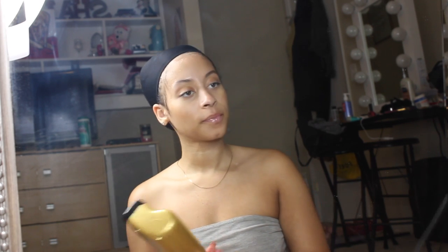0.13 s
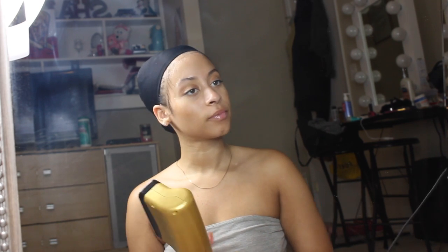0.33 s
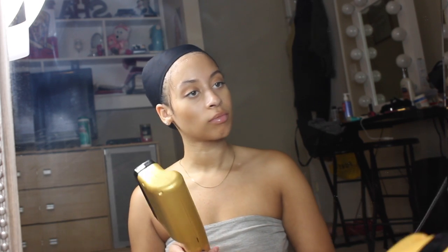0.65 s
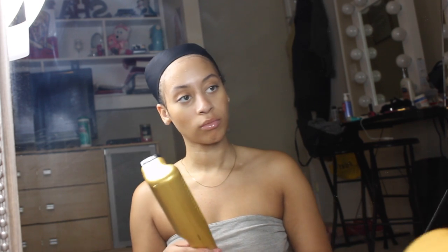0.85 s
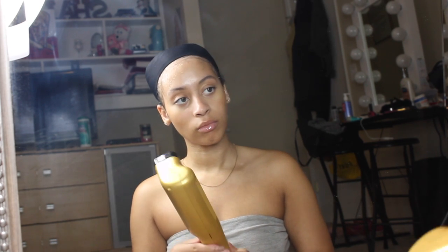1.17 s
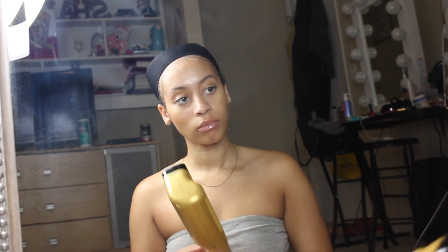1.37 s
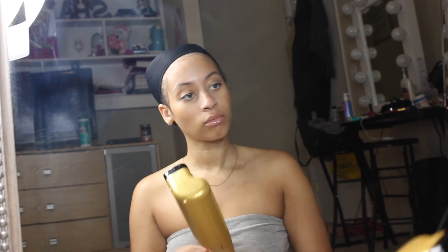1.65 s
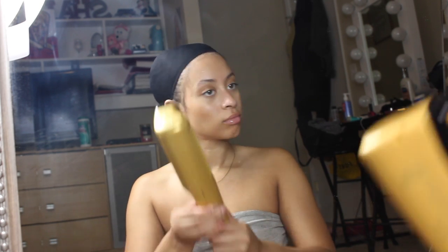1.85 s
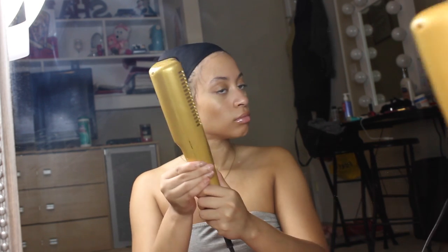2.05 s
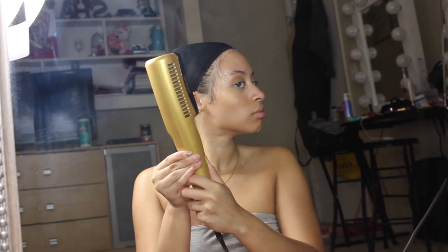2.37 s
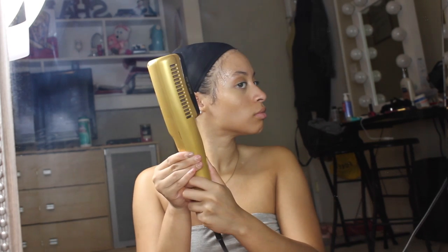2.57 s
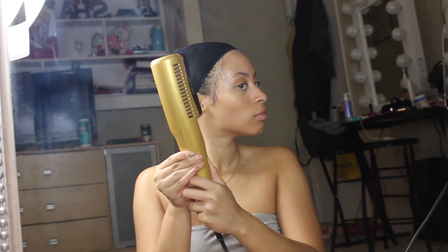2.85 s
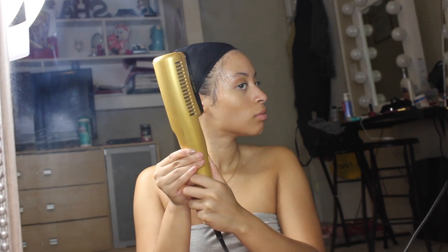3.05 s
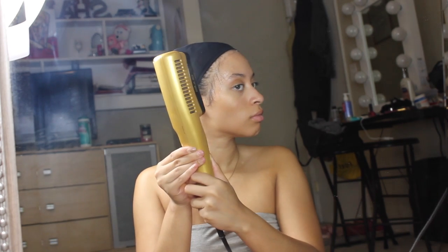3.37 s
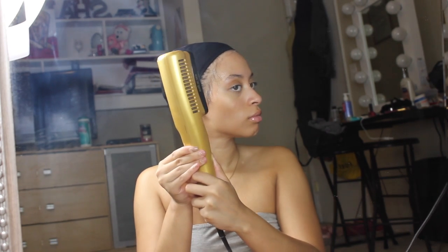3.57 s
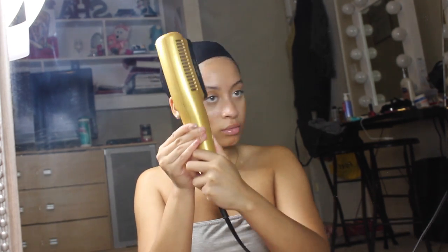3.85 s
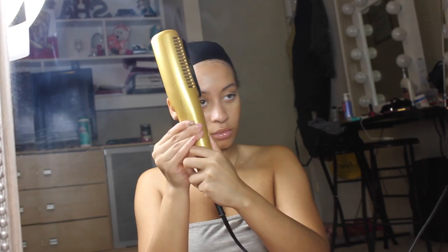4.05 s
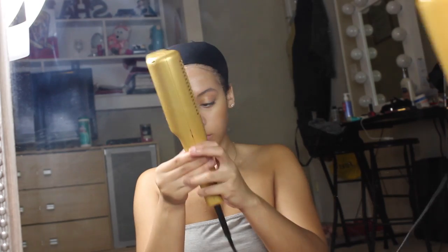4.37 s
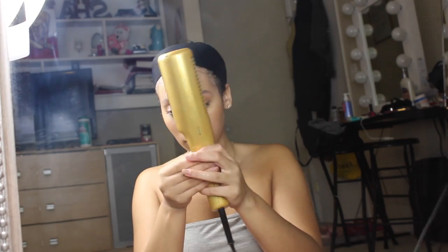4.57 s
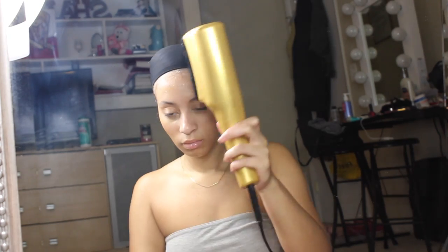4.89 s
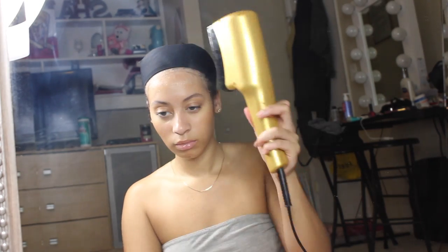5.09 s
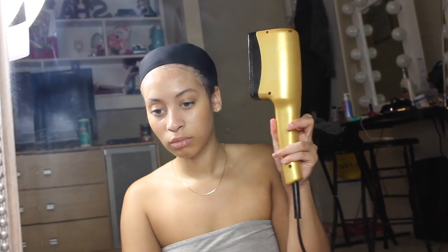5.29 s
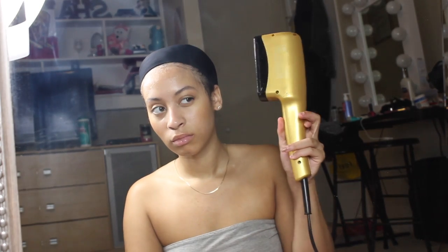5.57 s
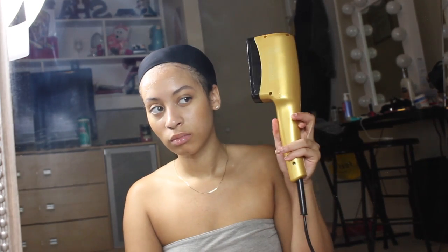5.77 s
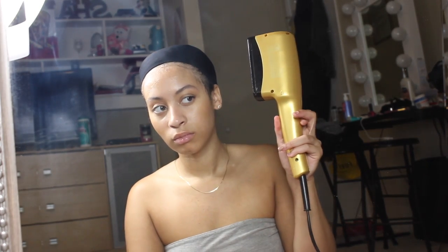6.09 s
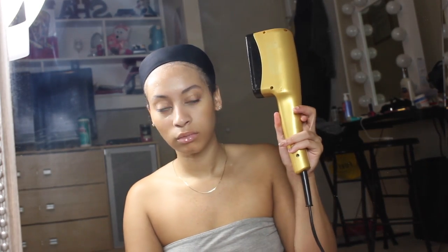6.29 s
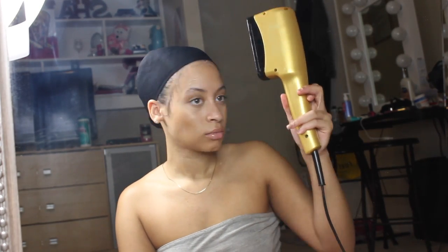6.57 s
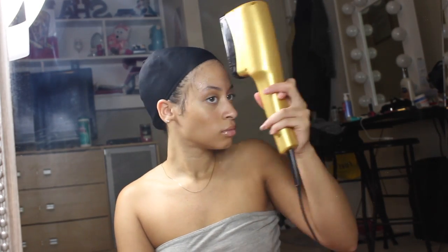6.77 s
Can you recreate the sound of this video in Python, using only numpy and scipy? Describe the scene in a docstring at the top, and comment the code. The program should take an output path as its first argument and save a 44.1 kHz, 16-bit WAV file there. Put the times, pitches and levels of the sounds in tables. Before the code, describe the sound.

A faint ventilation hum fills a small room. During the first second, fingers brush lightly over a hair dryer's plastic handle, and its slide switch gives soft ticks that grow clearer after 1 second. At about 1.25 and 1.35 seconds the switch snaps loudly, close to the microphone, briefly ringing the hollow housing. The fan spins up with a rising whistle and swelling air. At 1.9 seconds the sound jumps abruptly to full blast: a loud, steady, bright hiss over a thin fan whine. One high tone stands out more from about 2.2 to 4.3 seconds. A small click comes near 4.6 seconds, and the pitch wobbles slightly as the dryer is swung. Around 5 seconds the hiss changes colour as the dryer turns round, with faint passing whistles near 4.8, 5.3 and 6.7 seconds. It is still blowing at the end, near 7 seconds.

```python
"""In a small room, a hand-held hair dryer is switched on close to the microphone. Its slide switch ticks
and snaps twice, each impact ringing the hollow housing. The fan spins up with a rising whistle, then an edit
cuts abruptly to the dryer at full blast. Turbulent air hisses through the resonant duct over the harmonic
whine of the fan, changing colour as the dryer is held beside the head, swung past the face and turned round.
Fingers brush the handle at the start, and ventilation hums faintly underneath."""
import sys
import numpy as np
from scipy import signal
from scipy.fft import rfft, irfft
from scipy.io import wavfile
from scipy.ndimage import uniform_filter1d

SR = 44100
rng = np.random.default_rng(int(sys.argv[2]) if len(sys.argv) > 2 else 0)


def inscribe(sig):
    """Save sig as 16-bit PCM at rate SR to the path in sys.argv[1].

    A 1-D sig is mono; a 2-D sig holds one channel per row.
    Samples are clipped to [-1, 1] before scaling.
    """
    pcm = np.round(np.clip(np.atleast_2d(sig).T, -1, 1) * 32767)
    wavfile.write(sys.argv[1], SR, pcm.astype(np.int16))


N = 305833
TIME = np.arange(N) / SR
MOTOR_ON_S, CUT_S = 1.309, 1.892

# Air spectra beside the head and turned round. Each row: frequency in Hz, level in dB.
AIR_BESIDE = [(24, -78), (40, -43), (295, -20.5), (335, -24), (361, -17), (595, -6), (1230, -5.5),
              (1320, -5.5), (1830, -8), (2070, -5), (3170, -0.5), (3420, -4), (3780, -4.5), (7800, -8.5),
              (15700, -14.5)]
AIR_TURNED = [(24, -78), (40, -51), (111, -27), (326, -16), (370, -16.5), (674, -8), (1000, -8),
              (1320, -1.5), (1830, -11), (1970, -10), (2350, -6.5), (3020, -3), (3250, -3.5), (6390, -5.5),
              (15700, -11.5)]
# Brief whistles of the swinging nozzle. Each row: peak time in seconds, frequency in Hz, boost in dB.
NOZZLE_WHISTLES = [(2.05, 13600, 6), (4.75, 5750, 9), (5.27, 13200, 2), (5.28, 6900, 5), (5.3, 9680, 7),
                   (5.42, 5560, 7), (6.62, 7650, 6), (6.7, 14700, 9)]
def blast_air(beside_db=-19, turned_db=-19.5, flutter_db=.48):
    """Turbulence radiates broadband noise, whose spectrum depends on the direction of the dryer."""
    def colour(f, t):
        turn = orientation(t)
        air = (1 - turn) * spectrum(AIR_BESIDE, f) + turn * spectrum(AIR_TURNED, f)
        whistles = sum(db * bell(f, hz, .022 * hz) * bell(t, s, .18) for s, hz, db in NOZZLE_WHISTLES)
        return air + duct(f, turn) + whistles + interference(f, t)
    level_db = np.interp(orientation(), [0, 1], [beside_db, turned_db])
    return moving_noise(colour) * undb(level_db + flutter_db * walk(14))


# Air spectrum during spin-up. Each row: frequency in Hz, level in dB.
AIR_STARTING = [(24, -56), (40, -24), (235, -10.5), (333, -4.5), (368, -5), (496, -8), (758, -5),
                (949, -9.5), (1380, 0.5), (2010, -4.5), (2570, -2), (3140, -6.5), (8960, -15.5),
                (13000, -25), (15500, -47)]
def starting_air(level_db=-14.5, speed_power=4.2, dull_db=13, bright_at=.82):
    """Flow noise grows as a power of fan speed, and brightens as the flow quickens."""
    def colour(f, t):
        slowness = bright_at - spin_up(t)
        treble_loss_db = dull_db * slowness * np.log2(1 + f / 2500)
        return spectrum(AIR_STARTING, f) + duct(f, orientation(t)) - treble_loss_db
    return moving_noise(colour) * undb(level_db) * spin_up() ** speed_power


# Peaks and notches of duct and grille.
# Each row: frequency in Hz, half-width in Hz, gain in dB beside the head, gain in dB turned round.
DUCT_BANDS = [(626, 120, -0.5, 0.5), (1340, 150, 0, -1.5), (1845, 160, -3.5, -1), (2150, 63, -2.5, 2),
              (3020, 120, -1, 5), (3160, 95, -3, -7.5), (3989, 56, 4.5, 1), (4560, 150, 3, 2.5),
              (5062, 150, 1, 1), (5410, 180, 2.5, 3.5), (5900, 120, 1, 3), (6470, 320, 0.5, 4),
              (7200, 250, -0.5, -1), (7850, 440, 2.5, 1.5), (8540, 310, 2, 0), (12700, 450, 1.5, 5.5)]
def duct(f, turn):
    """Resonance and cancellation give a gain in dB that depends on the side facing the microphone."""
    return sum(bell(f, hz, width) * ((1 - turn) * beside_db + turn * turned_db)
               for hz, width, beside_db, turned_db in DUCT_BANDS)


def interference(f, t, count=12, depth_db=1.7):
    """Comb filtering, in dB: reflections from head, hands and walls change path as the dryer moves."""
    position = orientation(t) + .03 * t
    paths = rng.uniform([.002, -.0004, 0], [.015, .0004, 1], (count, 3))
    combs = sum(np.cos(2 * np.pi * (f * (lag_s + shift_s * position) + cycle))
                for lag_s, shift_s, cycle in paths)
    return depth_db * combs * np.sqrt(2 / count)


# Path of the dryer. Each row: time in seconds, turn from 0 (beside the head) to 1 (turned round).
TURN = [(1.85, 0.46), (1.92, 0.23), (2.3, 0.015), (4.1, 0.029), (4.4, 0.23), (4.9, 0.17), (5.3, 0.79),
        (6.6, 0.96), (6.93, 0.33)]
def orientation(t=TIME):
    """The dryer is a directional source: how far it is turned sets the colour that is heard."""
    return curve(TURN, t)


# Fan tones. Each row: multiple of the shaft speed, level in dB beside the head, level in dB turned round.
HARMONICS = [(1, -50, -57), (2, -50, -43), (3, -49, -53), (4, -35, -35), (5, -44, -39), (6, -36.5, -36.5),
             (7, -42, -47), (8, -56, -42), (9, -40, -33), (11, -44, -39), (12, -41, -50), (19, -56, -45),
             (20, -39, -48)]
def fan(waver_db=.7, flutter_db=2.1, blade_order=10):
    """Periodic rotation radiates harmonics of the shaft speed; at full blast each wavers on its own."""
    angle, turn = shaft_angle(), orientation()

    def tone(order, db):
        unsteady_db = waver_db * walk(4.05) + flutter_db * walk(50)
        return np.sqrt(2) * undb(db + unsteady_db) * np.sin(order * angle + rng.uniform(0, 2 * np.pi))
    blade = tone(blade_order, blade_level())
    whine = sum(tone(order, (1 - turn) * beside + turn * turned) for order, beside, turned in HARMONICS)
    return (blade + whine) * after_cut() + motor_whistle(angle)


# Spells of a louder blade tone. Each row: start in seconds, end in seconds, gain in dB.
INTAKE_FACING = [(2.173, 4.32, 13), (5.78, 6.0, 8)]
def blade_level(usual_db=-41, swell_s=.3):
    """Directivity: the level of the blade tone, in dB, swells while the intake faces the microphone."""
    return usual_db + sum(db * np.clip(np.minimum(TIME - start, end - TIME) / swell_s + .5, 0, 1)
                          for start, end, db in INTAKE_FACING)


def motor_whistle(angle, order=40, roughness=.8, low_speed_db=-25, speed_power=5.7, full_speed_db=-52):
    """Random modulation by eddies spreads a high shaft harmonic into a rough, shrill band."""
    eddies = 1 + roughness * (walk(300) + 1j * walk(300))
    whistle = unit(np.real(np.exp(1j * order * angle) * eddies))
    rising = undb(low_speed_db) * spin_up() ** speed_power
    return whistle * np.where(TIME < CUT_S, rising, undb(full_speed_db))


# Full speed, sagging and recovering with the load. Each row: time in seconds, turns per second.
FULL_SPEED = [(1.9, 336.1), (2.1, 339.9), (2.3, 337.6), (2.62, 335.4), (2.76, 337.6), (3.2, 336.4),
              (3.46, 333.4), (3.58, 336.8), (4.36, 333.7), (4.52, 336.1), (4.68, 328.0), (4.9, 333.7),
              (5.08, 347.5), (5.62, 337.6), (5.8, 338.9), (6.9, 337.1)]
def shaft_angle(low_speed_hz=272, jitter=.0013):
    """Phase, in radians, is the integral of the fan's speed, which eddies shake a little."""
    speed = low_speed_hz * spin_up() * (1 - after_cut()) + curve(FULL_SPEED) * after_cut()
    return 2 * np.pi * np.cumsum(speed * (1 + jitter * walk(90))) / SR


def spin_up(t=TIME, lag_s=.275):
    """First-order lag: the share of its low speed the fan has reached, rising fast, then levelling off."""
    return np.maximum(1 - np.exp(-(t - MOTOR_ON_S) / lag_s), 0)


def after_cut(crossfade_s=.012):
    """A brief linear crossfade to the dryer at full blast: 0 before the cut, 1 after it."""
    return np.clip((TIME - CUT_S) / crossfade_s + .5, 0, 1)


# Contacts of switch and housing. Each row: start in seconds, level in dB, treble tilt in dB per octave,
# relative level of the ring in dB, time for the crack to fall 60 dB in seconds.
CONTACTS = [(.198, -49, -3, 14, .07), (.572, -46, -8, -6, .08), (.648, -42, -3, -15, .06),
            (.696, -43, -5.5, -15, .04), (1.013, -28.5, -11, -11, 0.037), (1.133, -27.5, -3.5, -8, 0.033),
            (1.178, -36, -15, -20, .045), (1.2463, -10, -1, -14, 0.031), (1.2492, 0, -0.5, -18, 0.02),
            (1.2585, -10, 1, -19, .025), (1.276, -13.5, -1, -8, 0.049), (1.282, -7, -3, -11, 0.015),
            (1.365, -12, 6, -1, 0.024), (1.3673, -5.5, -2, -0.5, 0.027), (4.56, -14, 2, -22, 0.028)]
# Spectrum of the plastic crack. Each row: frequency in Hz, level in dB.
CRACK = [(120, -67), (200, -41), (596, -34), (769, -1), (1170, -13.5), (1280, -8.5), (1430, 1), (1590, -13),
         (2020, -3), (2600, -7), (4920, -9.5), (8660, -6), (15500, -33)]
# Modes of the hollow housing. Each row: frequency in Hz, level in dB, time to fall 60 dB in seconds.
HOUSING_MODES = [(794, -21, 0.071), (1155, -20, 0.17), (1426, -0.5, 0.033), (1480, -15, .07),
                 (2035, -10, 0.057)]
def switch(attack_s=.00051, low_cut_hz=510):
    """Impact excitation: each contact is a short crack that also rings the damped modes of the housing."""
    out, t = np.zeros(N + SR), TIME[:SR // 4]
    ring = sum(undb(db - 60 * t / t60) * np.sin(2 * np.pi * hz * t) for hz, db, t60 in HOUSING_MODES)
    attack = 1 - np.exp(-t / attack_s)
    for s, db, tilt_db, ring_db, t60 in CONTACTS:
        crack = noise(lambda f: spectrum(CRACK, f) + tilt_db * np.log2(np.maximum(f, 700) / 700), len(t))
        click = crack * undb(-60 * t / t60) + undb(ring_db) * ring
        start = int(s * SR)
        out[start:start + len(t)] += undb(db) * click * attack
    # the small housing radiates hardly any bass
    return signal.sosfilt(signal.butter(4, low_cut_hz, "high", fs=SR, output="sos"), out[:N])


# Spectrum of the jolted handle. Each row: frequency in Hz, level in dB.
THUD = [(60, -25), (170, -11), (330, -9), (460, 8), (560, -1), (800, -25), (3000, -60)]
def handle_knock(start_s=1.247, level_db=-28.5, attack_s=.0012, t60=.04):
    """A heavily damped impact: the handle thuds as the switch gives way at the first snap."""
    age = np.maximum(TIME - start_s, 0)
    envelope = undb(level_db - 60 * age / t60) * (1 - np.exp(-age / attack_s))
    return noise(lambda f: spectrum(THUD, f)) * envelope


# Finger slides on the handle. Each row: peak time in seconds, half-width in seconds, level in dB.
RUBS = [(.05, .03, -62), (.19, 0.076, -65), (0.567, .04, -63), (.66, .03, -66), (.96, .09, -64)]
def fingers(centre_hz=9500, width_hz=8000, grain_db=2):
    """Sliding friction of skin on smooth plastic makes a faint, grainy, high rustle."""
    swell = sum(undb(db) * bell(TIME, s, width) for s, width, db in RUBS)
    return noise(lambda f: 30 * bell(f, centre_hz, width_hz)) * swell * undb(grain_db * walk(121))


def in_room(x, echo_s=.0093, echo_db=-14, tail_db=-14, t60=.24):
    """Reverberation: one near surface reflects first, then comes the short tail of a furnished room."""
    t = TIME[:SR // 2]
    tail = noise(lambda f: spectrum([(1500, -3.5), (8000, -3), (15000, -8)], f), len(t))
    tail *= undb(-60 * t / t60) * (t > echo_s)
    response = undb(tail_db) * tail / np.linalg.norm(tail)
    response[int(echo_s * SR)] += undb(echo_db)
    return x + signal.fftconvolve(x, response)[:N]


# Spectrum of the ventilation. Each row: frequency in Hz, level in dB.
VENTILATION = [(15, -48), (25, -25), (112, -12), (176, -16.5), (219, -8.5), (286, -7.5), (318, -7),
               (427, -14.5), (879, -18.5), (978, -11), (1060, -18.5), (2370, -20.5), (2780, -23.5),
               (9520, -36), (15000, -51)]
# Hums within it. Each row: frequency in Hz, half-width in Hz, boost in dB.
HUMS = [(221, 6.2, 6), (976, 20, 4.5), (1870, 120, 5.5)]
def room_tone(air_db=-47, air_sink_db=-6, drone_hz=110, drone_db=-57, drone_sink_db=-13):
    """Ambient noise: a low drone sinks before the dryer starts, the humming ventilation as it starts."""
    air = noise(lambda f: spectrum(VENTILATION, f) + sum(db * bell(f, hz, w) for hz, w, db in HUMS))
    air *= undb(air_db + air_sink_db * np.clip((TIME - MOTOR_ON_S) / .071, 0, 1))
    drone = np.sqrt(2) * np.sin(2 * np.pi * drone_hz * TIME + .56 * walk(10))
    waver_db = 3.5 * walk(14)
    fade_db = curve([(.76, 0), (1.06, drone_sink_db)])
    return air + drone * undb(drone_db + waver_db + fade_db)


def undb(db):
    """Decibels to amplitude gain."""
    return 10 ** (np.asarray(db) / 20)


def unit(x):
    """Normalisation to rms 1."""
    return x / np.sqrt(np.mean(x ** 2))


def curve(rows, t=TIME):
    """Linear interpolation of (seconds, value) rows."""
    return np.interp(t, *np.transpose(rows))


def spectrum(rows, f):
    """Interpolation of (Hz, dB) rows on a log-frequency axis."""
    hz, db = np.transpose(rows)
    return np.interp(np.log(f + 1), np.log(hz), db)


def bell(x, centre, width):
    """A Gaussian of height 1, falling to 1/e at one width from its centre."""
    return np.exp(-((x - centre) / width) ** 2)


def noise(colour, size=N):
    """Stationary noise of rms 1 whose spectrum in dB is colour(f)."""
    gain = undb(colour(np.fft.rfftfreq(size, 1 / SR)))
    return unit(irfft(rfft(rng.standard_normal(size)) * gain, size))


def moving_noise(colour):
    """Time-varying filtering: noise of steady rms 1 whose spectrum in dB is colour(f, t)."""
    f, t, frames = signal.stft(rng.standard_normal(N), SR, nperseg=2048)
    gain = undb(colour(f[:, None], t))
    gain /= np.sqrt(np.mean(gain ** 2, axis=0))
    return signal.istft(frames * gain, SR)[1][:N]


def walk(rate):
    """Smooth random fluctuation of rms 1, changing rate times a second."""
    hold = max(int(SR / rate), 1)
    steps = np.repeat(rng.standard_normal(N // hold + 1), hold)
    return unit(uniform_filter1d(uniform_filter1d(steps, hold), hold)[:N])


def scene():
    """Superposition of dryer, fingers and room tone, the same in both channels."""
    clicks = in_room(switch() + handle_knock())
    air = starting_air() * (1 - after_cut()) + blast_air() * after_cut()
    return np.tile(fingers() + clicks + air + fan() + room_tone(), (2, 1))


def record(dry, top_hz=15850):
    """Hard clipping holds the loudest snaps at full scale; a steep low-pass then cuts the top."""
    low_pass = signal.ellip(10, .1, 70, top_hz, fs=SR, output="sos")
    return signal.sosfilt(low_pass, np.clip(dry, -1, 1))


dry = scene()
out = record(dry)
inscribe(out)
```